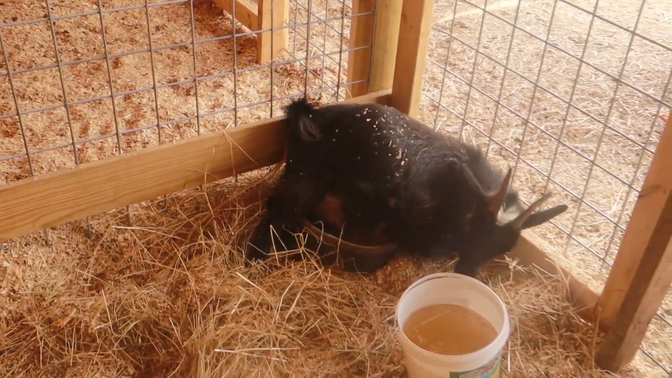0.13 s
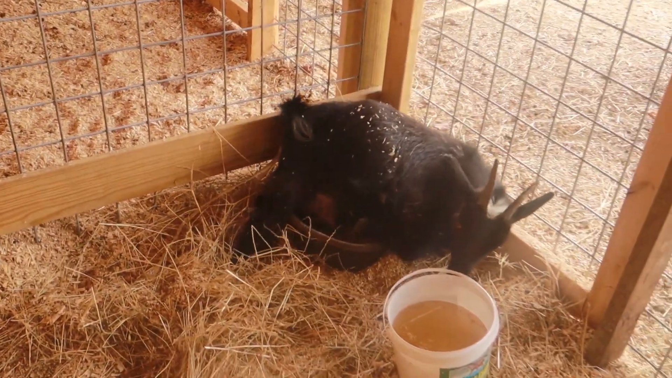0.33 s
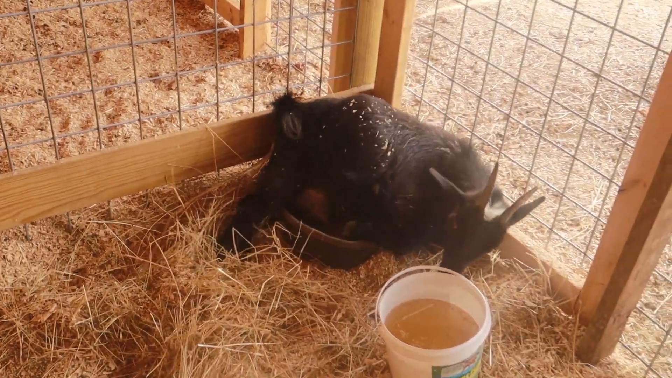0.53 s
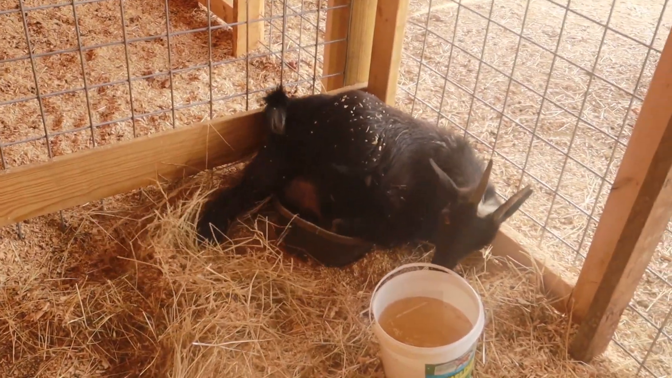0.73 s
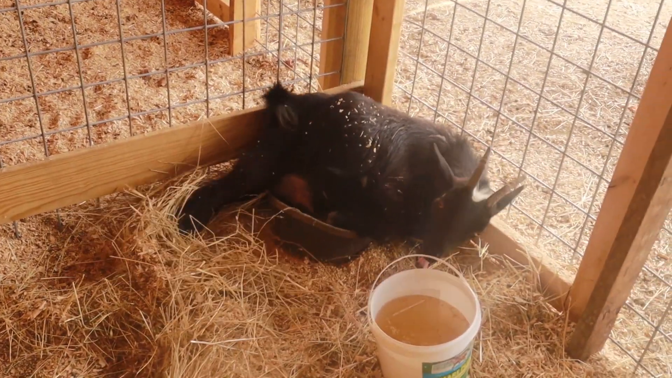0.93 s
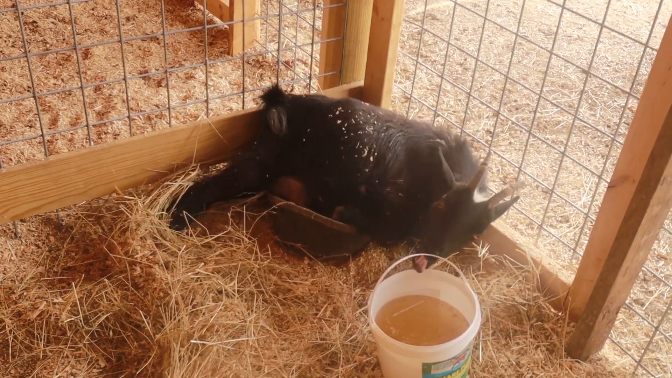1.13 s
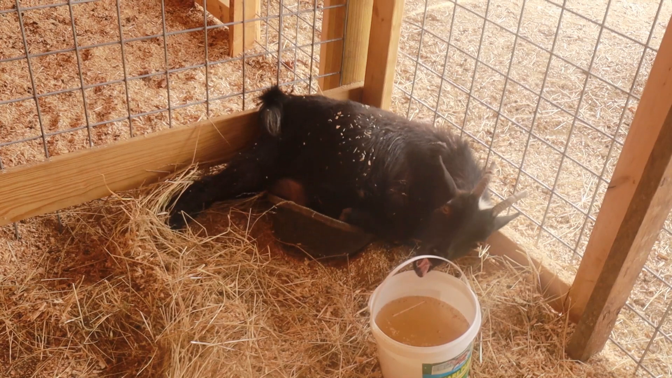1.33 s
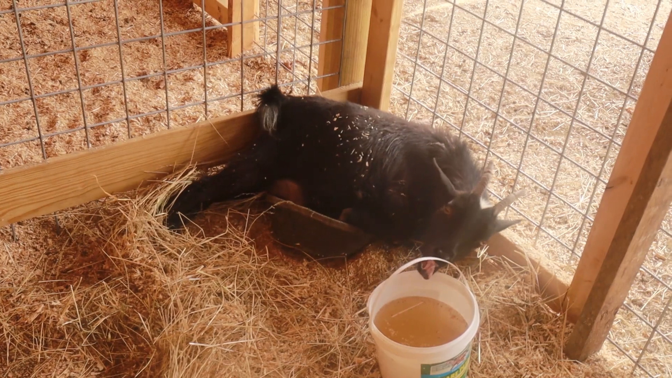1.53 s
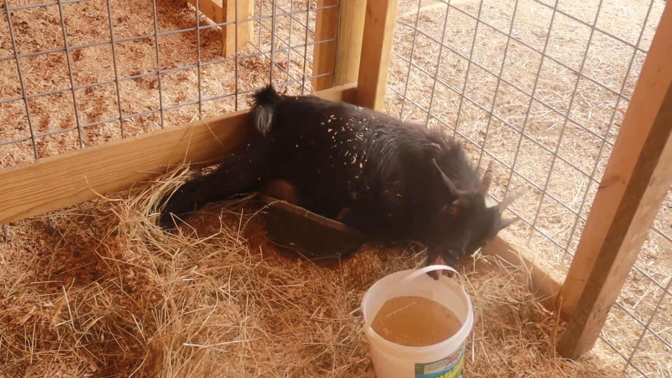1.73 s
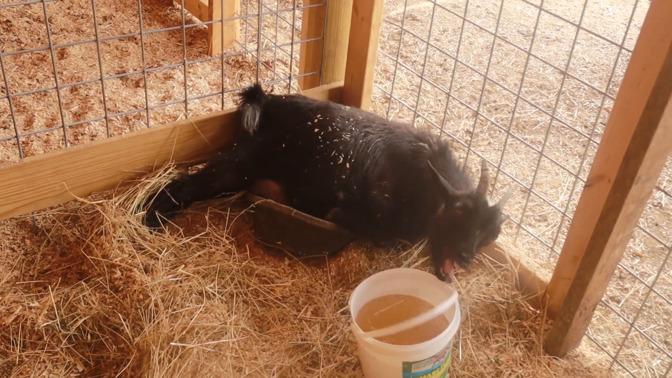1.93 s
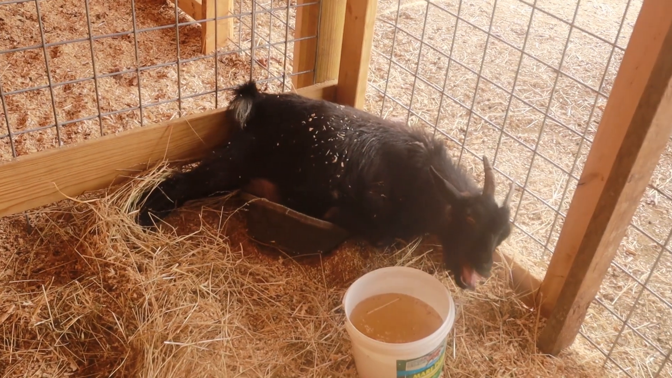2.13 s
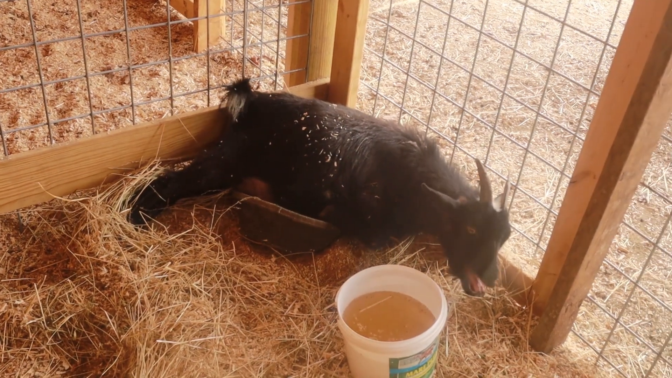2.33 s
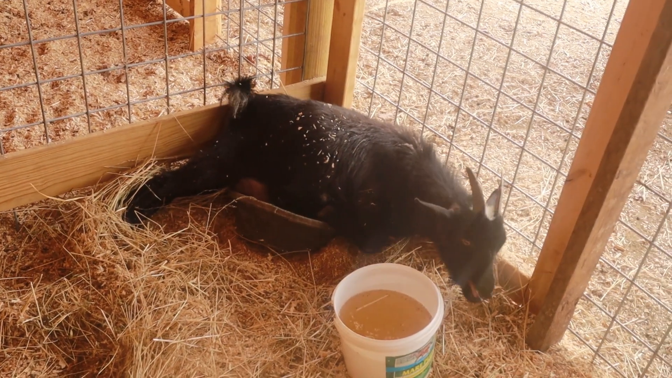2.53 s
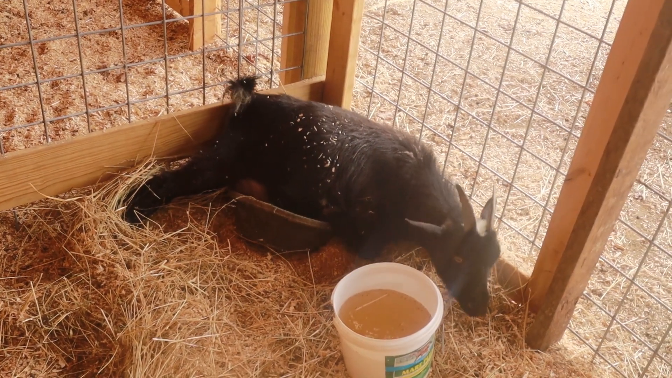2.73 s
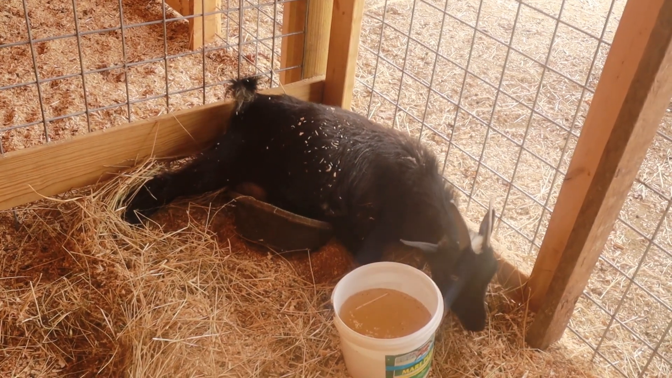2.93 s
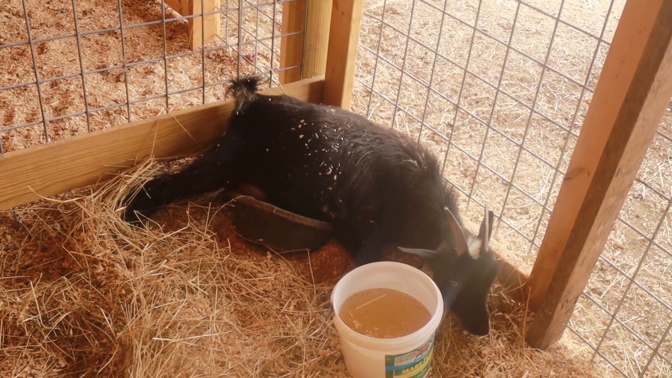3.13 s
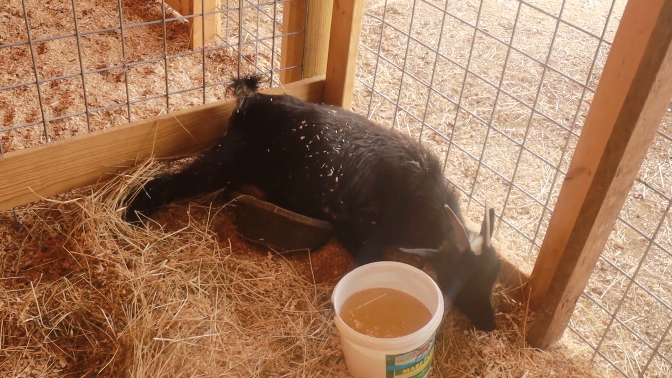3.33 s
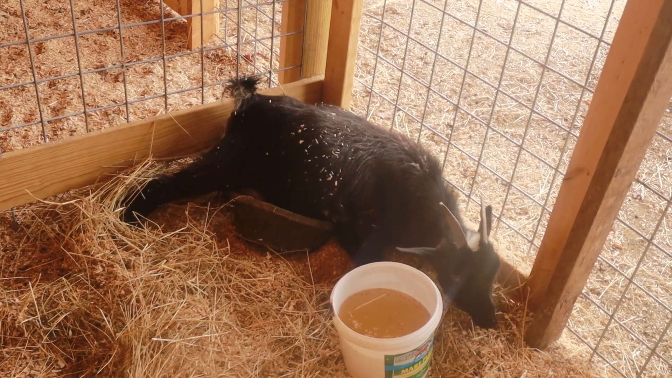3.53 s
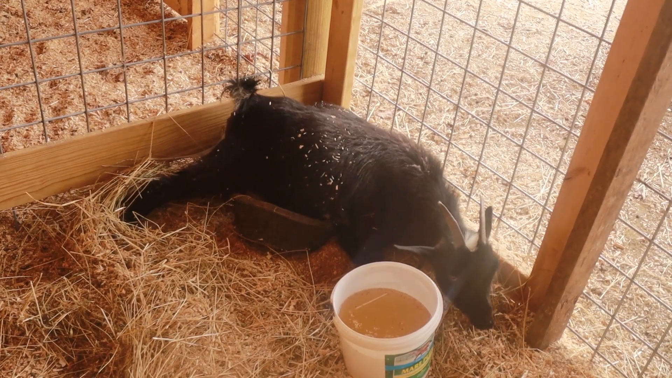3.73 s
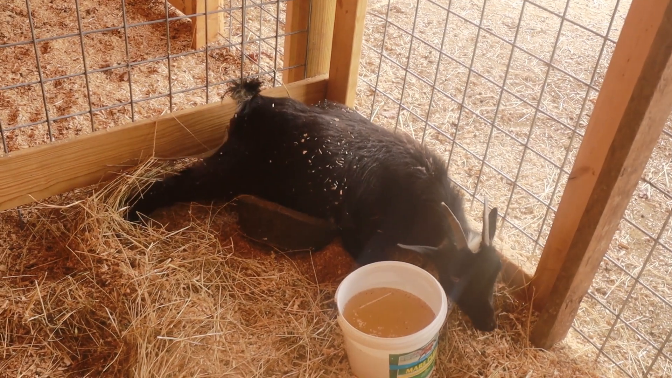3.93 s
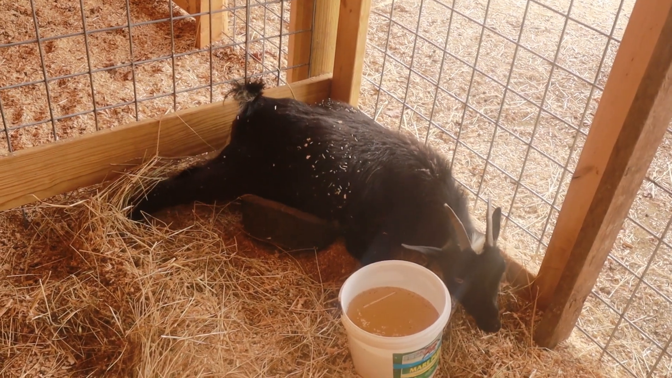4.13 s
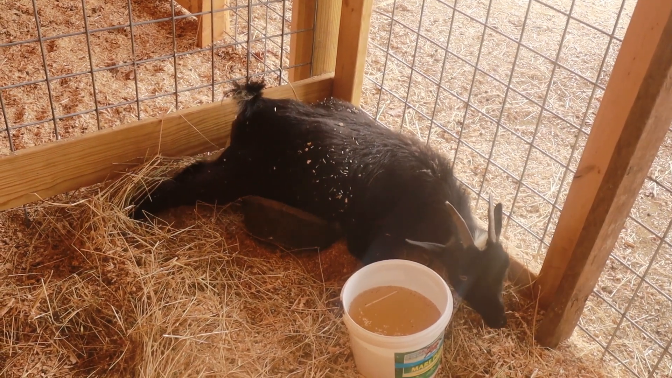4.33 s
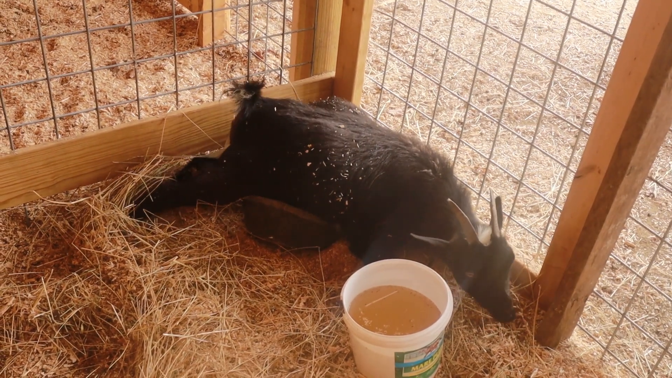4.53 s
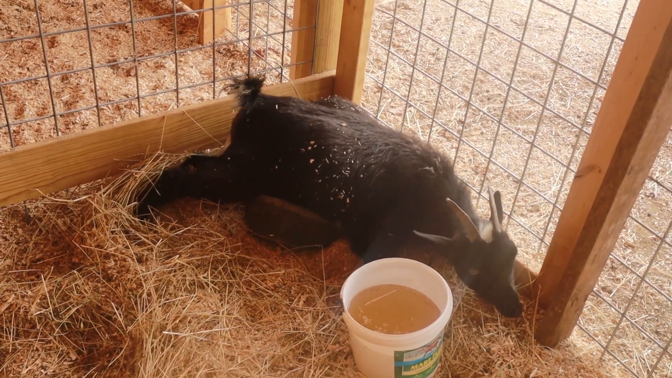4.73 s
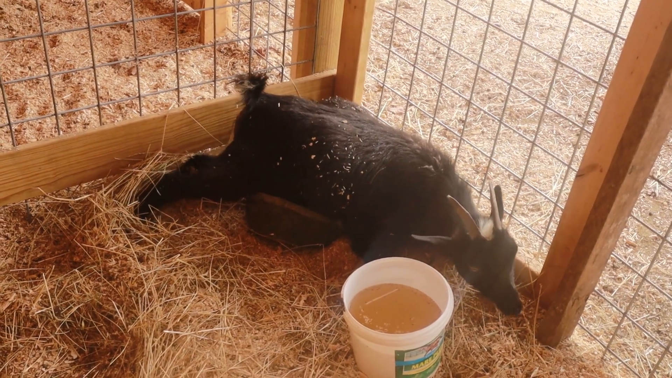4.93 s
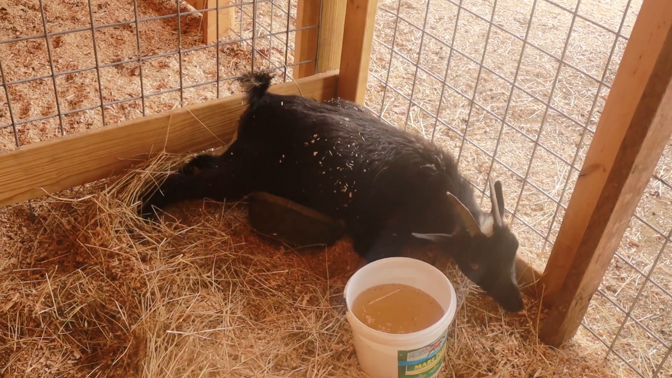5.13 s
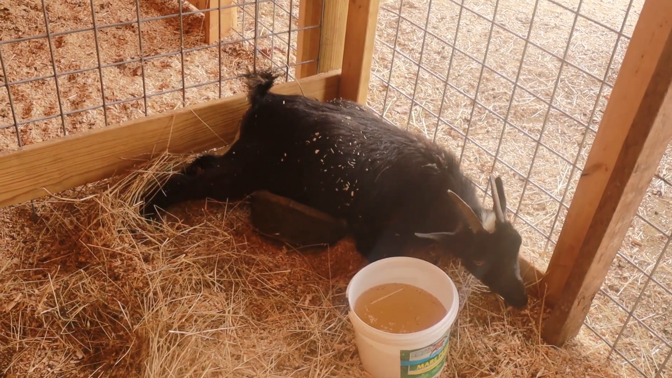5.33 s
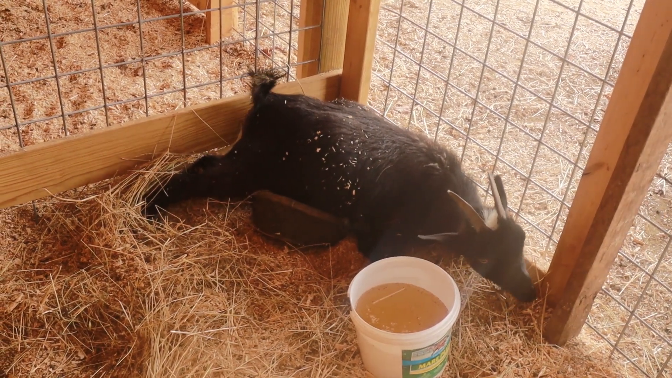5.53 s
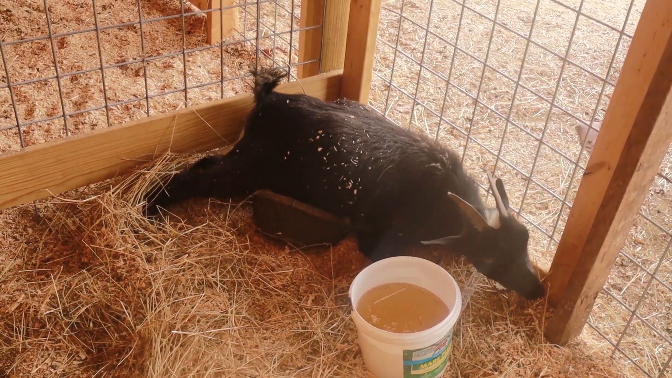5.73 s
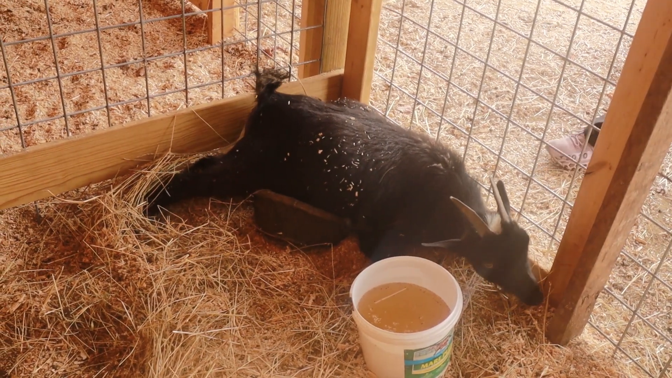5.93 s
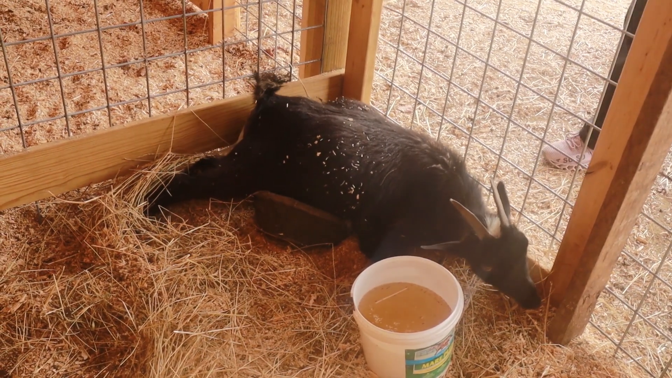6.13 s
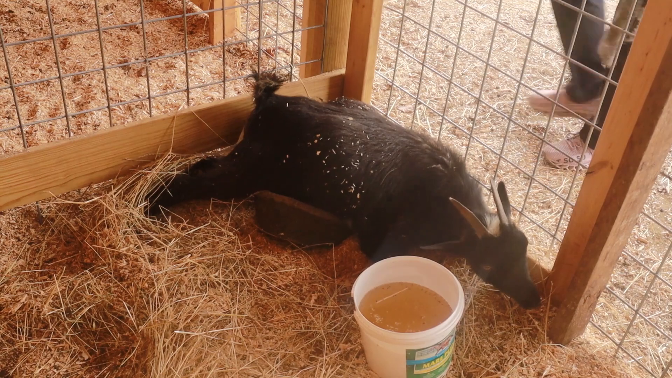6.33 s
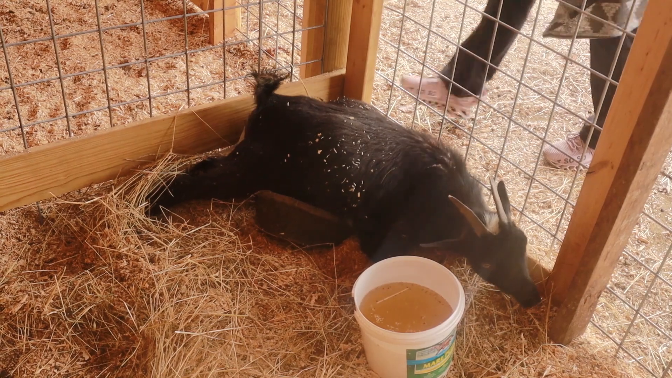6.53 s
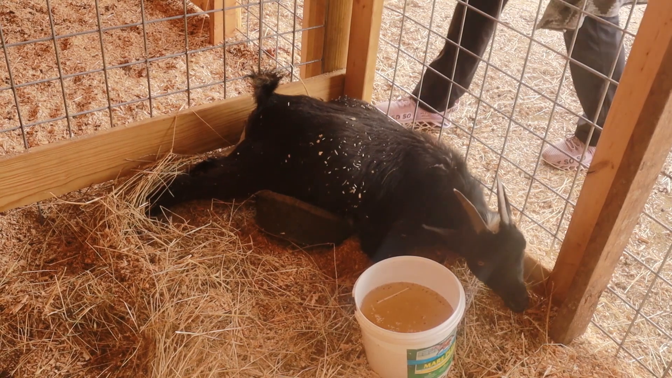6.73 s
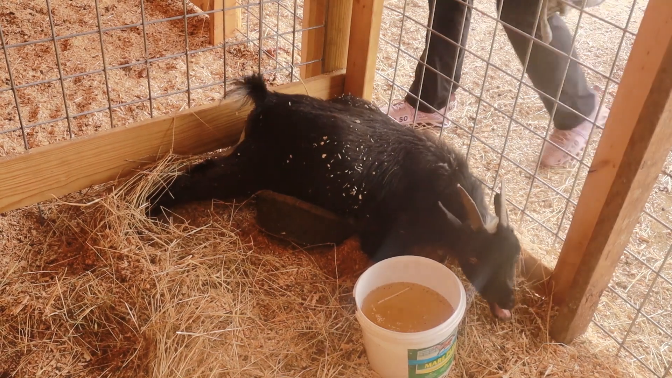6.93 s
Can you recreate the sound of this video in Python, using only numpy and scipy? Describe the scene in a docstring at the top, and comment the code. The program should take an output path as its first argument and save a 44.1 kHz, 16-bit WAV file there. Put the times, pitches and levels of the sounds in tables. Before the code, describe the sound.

A nearby handheld microphone catches a goat's piercing, nearly human-like scream with a short stall echo, first clear and high, later rough and fading. Then comes a lull: faint fan-like drone, gusts rumbling on the microphone, rustling straw, dull knocks, thin bird buzzes and a trembling bleat from a distant young goat. At the end the goat starts a rougher, broken cry that stops abruptly.

```python
"""Throughout: barn murmur, fan-like drone (filtered noise), wind and gusts on the microphone (low noise).
From the start, straw swishes and knocks (noise bursts); at 0.3 s a goat in a straw stall strains out a
long scream (vocal-fold pulses and hoarse noise through a moving mouth, plus echo). The murmur sinks.
From 3.3 s small birds buzz and whistle (pulsed noise, gliding sines); at 3.8 s a far kid bleats (chopped
pulses and noise). At 6.5 s a second, hoarser scream begins and the murmur sinks again."""
import sys
import numpy as np
from scipy import signal
from scipy.fft import rfft, irfft, next_fast_len
from scipy.io import wavfile
from scipy.ndimage import uniform_filter1d, map_coordinates

SR = 44100
rng = np.random.default_rng(int(sys.argv[2]) if len(sys.argv) > 2 else 0)


def wav_out(sig):
    """Save sig, one row per channel (or a flat mono array), as 16-bit PCM at SR to the path in sys.argv[1]."""
    wavfile.write(sys.argv[1], SR, np.round(np.clip(np.atleast_2d(sig).T, -1, 1) * 32767).astype(np.int16))


N = 311787


def amp(db):
    """dB to linear gain."""
    return 10 ** (np.asarray(db) / 20)


def unit(x):
    """x scaled to RMS 1."""
    return x / np.sqrt(np.mean(x ** 2) + 1e-20)


def along(points, hz):
    """(Hz, value) points interpolated on a log-frequency axis."""
    f, v = np.transpose(points)
    return np.interp(np.log(hz + 1), np.log(f + 1), v)


def curves(rows, t):
    """One curve over t for each column after the first."""
    s, *cols = np.transpose(rows)
    return [np.interp(t, s, c) for c in cols]


def wobble(rate_hz, size=N):
    """Smooth random curve of RMS 1, rate_hz knots a second."""
    knots = rng.standard_normal(int(size * rate_hz / SR) + 4)
    return unit(map_coordinates(knots, [np.arange(size) * rate_hz / SR]))


def filtered(x, response):
    """x times a response of frequency, via a padded FFT."""
    m = next_fast_len(len(x) + 8192)
    spectrum = rfft(x, m) * response(np.fft.rfftfreq(m, 1 / SR))
    return irfft(spectrum, m)[:len(x)]


def noise(spectrum, size=N):
    """Noise of RMS 1 shaped by (Hz, dB) points."""
    return unit(filtered(rng.standard_normal(size), lambda hz: amp(along(spectrum, hz))))


def add(out, s, x):
    """Mixes x into out from time s."""
    part = out[round(s * SR):][:len(x)]
    part += x[:len(part)]


def pulses(phase, count):
    """Equal harmonics at scattered phases, RMS 1."""
    turns_rad = rng.uniform(0, 2 * np.pi, count)
    return unit(sum(np.cos((k + 1) * phase + turn) for k, turn in enumerate(turns_rad)))


# barn murmur spectrum: [f/Hz, level/dB per Hz]
BARN_SPECTRUM = [(41, -42), (70, -5.5), (88, -5.5), (135, -1), (161, -7.5), (198, -12), (227, -12.5),
                 (372, -14.5), (701, -22), (1510, -27.5), (1980, -31), (3260, -35), (15500, -45.5)]
# drone bands: [f/Hz, half width/Hz, level/dB re unit murmur]
DRONE_BANDS = [(99, 8, -9), (130.6, 5, -3.5), (195, 12, -11.5)]
# gain of murmur, drone and breeze, sinking under each cry: [t/s, gain/dB]
BARN_GAIN = [(0, -42), (.6, -42.5), (1.1, -50), (2.2, -53.5), (2.9, -52), (3.46, -47), (3.6, -46.5),
             (4.1, -43), (6.4, -43), (6.7, -46.5), (7.07, -49.5)]
# gusts on the microphone: [centre t/s, half width/s, level/dB]
WIND_GUSTS = [(.2, .2, -47), (1.48, .15, -45.5), (3.48, 0.098, -41), (4.3, .25, -51), (4.73, .09, -36.5),
              (5.1, 0.21, -50), (6.72, .12, -44.5)]
BREEZE_DB = -10.5  # re unit murmur


def background():
    """Broadband murmur, drone of narrow noise bands, and low-frequency wind with gusts."""
    t = np.arange(N) / SR
    barn_db, = curves(BARN_GAIN, t)
    barn = amp(-1.5 + 0.44 * wobble(3.6) + 0.92 * wobble(34)) * noise(BARN_SPECTRUM)
    for hz, half_width_hz, db in DRONE_BANDS:
        band = filtered(rng.standard_normal(N), lambda f: 1 / (1 + ((f - hz) / half_width_hz) ** 2))
        barn += amp(db) * unit(band)
    rumble = noise([(10, -14.5), (30, 4.0), (60, -2), (90, -18.5), (200, -57.5)])
    wind = unit(amp(1.1 * wobble(8.8)) * rumble)
    gusts = sum(amp(db) * np.exp(-((t - s) / width) ** 2) for s, width, db in WIND_GUSTS)
    return amp(barn_db) * (barn + amp(BREEZE_DB) * wind) + gusts * wind


# swishes: [t/s, length/s, level/dB before envelope, tilt/dB (doubled at 10 kHz)]
STRAW_SWISHES = [(.0, 0.14, -53, -4), (2.749, 0.078, -59, -2), (3.162, 0.039, -62.5, -9),
                 (3.811, 0.075, -53.5, -0.5), (3.984, 0.064, -44.5, 0.5), (4.138, 0.079, -51.5, 0),
                 (4.256, 0.065, -45.5, -3), (4.358, 0.02, -48, 1), (4.963, 0.048, -55.5, -7),
                 (5.25, 0.067, -54.5, -6), (5.565, 0.024, -54.5, -1), (6.428, 0.085, -41.5, -8.5)]
# knocks and ticks: [t/s, level/dB before envelope, ring f/Hz, t60/s, spectrum at 5 kHz/dB re ring]
STRAW_KNOCKS = [(0.057, -37.5, 1460, 0.087, -36), (0.179, -42.5, 1460, 0.076, -40),
                (3.229, -51.5, 904, 0.086, -35), (3.428, -45, 900, 0.17, -42),
                (4.375, -36, 399.5, 0.24, -23), (5.493, -44, 1506, 0.031, -25),
                (5.662, -43, 1420, 0.13, -46), (6.003, -39.5, 1480, 0.085, -19.5),
                (6.13, -30, 392, 0.15, -41), (6.321, -49, 1530, 0.048, -25), (6.454, -39, 1200, 0.65, -23)]


def straw():
    """Swishes: flickering noise in a Hann window; knocks: decaying noise peaked at the ring frequency."""
    out = np.zeros(N)
    for s, length_s, db, tilt_db in STRAW_SWISHES:
        size = round(length_s * SR)
        colour = [(500, 6), (2500, 9.4), (10000, 2 * tilt_db), (15000, 2 * tilt_db - 30)]
        crackle = noise(colour, size=size)
        add(out, s, amp(db + 2.7 * wobble(454, size=size)) * np.hanning(size) * crackle)
    t = np.arange(SR // 5) / SR
    for s, db, hz, t60_s, crack_db in STRAW_KNOCKS:
        peak = [(hz / 1.8, -12), (hz, 0), (hz * 1.8, -12)]
        ring = noise([(20, -40), *peak, (5000, crack_db), (16000, crack_db - 25)], size=len(t))
        attack = 1 - np.exp(-t / 0.00094)
        add(out, s, amp(db - 60 * t / t60_s) * attack * ring)
    return out


# even folds, gains re clear voice: [hoarse noise/dB, half pitch/dB, quarter pitch/dB]
EVEN_FOLDS_DB = (-31.5, -40.5, -42.5)
# rough spells, added to the even gains:
# [start t/s, end t/s, hoarse noise/dB, half pitch/dB, quarter pitch/dB], re clear voice
ROUGH_SPELLS = [(.28, 0.56, -6, -18, -34), (.715, 0.74, -23.5, -41, -40), (.92, 1.101, -20.5, -38, -39.5),
                (1.05, 1.089, -17.5, -14, -35.5), (1.1, 1.35, -24, -25.5, -39),
                (1.28, 1.315, -17.5, -7.5, -41), (1.36, 1.76, -0.5, -7, -16.5),
                (1.76, 1.909, -5, -4.5, -20.5), (1.919, 2.058, -16, -6, -44.5), (2.135, 2.169, -9, -8, -39),
                (2.135, 2.231, -14, -23, -44), (2.235, 2.34, -21.5, -22, -44),
                (2.34, 2.444, -6.5, -24, -38), (2.44, 2.599, 1, -4, -40), (6.48, 6.809, 7.5, -1, -24),
                (6.81, 6.908, -1.5, -9, -16.5), (6.91, 7.1, 5.5, -2, 3)]
SPELL_EDGE_S = .025


def folds(t):
    """Gains of hoarse noise, half pitch and quarter pitch: an even base plus the rough spells."""
    start, end, *db = np.transpose(ROUGH_SPELLS)[..., None]
    on = np.clip(np.minimum(t - start, end - t) / SPELL_EDGE_S + .5, 0, 1) ** 2
    return amp(EVEN_FOLDS_DB)[:, None] + (amp(db) * on).sum(axis=1)


# first and second cry: [t/s, pitch f/Hz, level/dB]
CRY_1 = [(.3, 321.7, -60.5), (.4, 317.2, -39.5), (.49, 379.8, -32), (.55, 433, -29), (.58, 466, -11.5),
         (.69, 475.4, -11), (.76, 445.2, -12.5), (.89, 435.6, -13), (1.07, 401.7, -12.5),
         (1.2, 409.4, -13.5), (1.45, 403.4, -13), (1.89, 400.3, -15), (2.19, 401, -18), (2.335, 401.2, -21),
         (2.35, 374, -22.5), (2.38, 375.7, -23), (2.42, 349, -27.5), (2.445, 368.2, -27),
         (2.48, 356.6, -41.5), (2.57, 350, -75)]
CRY_2 = [(6.5, 338.2, -47), (6.512, 346.5, -45), (6.53, 350.5, -26), (6.56, 353.2, -26.5),
         (6.61, 350.9, -37), (6.64, 361.3, -29), (6.7, 383.9, -24.5), (6.81, 395, -24.5),
         (6.84, 413.4, -9.5), (6.9, 419.7, -13), (7.0, 429, -12.5), (7.07, 416.4, -13)]
# path through the mouth shapes: [t/s, shape index]
MOUTH_PATH_1 = [(0.419, 0), (.53, .3), (.59, 1), (0.699, 1), (.77, 2), (.9, 2), (1.05, 3), (1.33, 3),
                (1.37, 4), (1.9, 4), (2.08, 5), (2.32, 5), (2.35, 6)]
MOUTH_PATH_2 = [(6.5, 1.5), (6.6, 0), (6.66, 1), (6.81, 2.5), (6.83, 3), (6.9, 3.5), (7.07, 4)]
# mouth responses: [f/Hz, then one level/dB per shape]
MOUTH_SHAPES_1 = [(407, -2.5, -39, -35, -37.5, -24.5, -33, -16), (910, -4, 6.5, 2.5, -8, -15.5, -21, -10),
                  (1050, -15.5, -15, -2, -6.5, -3.5, -8.5, 2.5), (1470, -4, -13, 0, -12.5, -15, -16, -5),
                  (1940, -21.5, -12, -4.5, -3, -1.5, -1.5, -2), (2380, -13, -17, -2, 0.5, -0.5, -1, -4),
                  (3144, -12, -11, -11, -12, -14.5, -11.5, -8.5),
                  (3940, -7, -11.5, 2.5, -5, -9.5, -9.5, -8.5), (4470, -7.5, -6.5, -1, -2, -11, -6, -3),
                  (6440, 0.5, -17, -14, -7, -11.0, -12.5, -7),
                  (7140, -24, -22.5, -10, -18.5, -32.5, -30.5, -29),
                  (8500, -16, -26.5, -16.5, -15.5, -22.5, -21.5, -10),
                  (10900, -28, -51, -33.5, -38, -38.5, -33, -20),
                  (15000, -49, -68.5, -60.5, -53, -53.5, -55.5, -42.5)]
MOUTH_SHAPES_2 = [(204, 4, 0, -10, -10, -38), (410, 6, 4, -17, -16, -23.5), (609, -9, 1, 2.5, -12, -24.5),
                  (900, -15, -18, -28.5, 7, -20), (950, -25, -20, -13, -15, 7),
                  (1137, -12, -13, -11, -19, 0), (1566, -16, -1.5, -9, -17.5, -7.5),
                  (2030, -27, -21, 0, -17, -4.5), (2530, -17, -25, -5.5, -4.5, 5),
                  (2970, -6, -7, -25, -14.5, -6.5), (3733, -23, -9.5, -7.5, -11, -7.5),
                  (4730, -3.5, -16, -15.5, -7, -10.5), (6300, -20, -10.5, -4, -10, -5.5),
                  (7476, -19, -30, -45, -41, -21.5), (8400, -40, -20.5, -15.5, -23, -13.5),
                  (14730, -55, -56.5, -48.5, -58.5, -51)]
# fundamental re the mouth-filtered voice, before its waver: [level/dB per shape]
FUNDAMENTAL_1_DB = [-7, -32.5, -39, -30.5, -29, -32, -32.5]
FUNDAMENTAL_2_DB = [-7, -16, -13, -15.5, -29]
# hoarse noise before the mouth: [f/Hz, level/dB]
HOARSE_SPECTRUM = [(300, -2.5), (600, -8), (1000, 5.5), (2200, -11), (3500, 4.5), (6000, 6.5),
                   (12000, -5.5)]
# trembling held note: [start t/s, end t/s, rate/Hz, pitch share]
HELD_QUAVER = (1.04, 1.36, 12.5, .009)
TREMOR_SHARE = .003  # RMS pitch waver


def cry(rows, path, mouths, fundamental_db, flutter_db, waver_db, jitter_rad, low_hz):
    """Fold pulses, subharmonics and hoarse noise through a moving mouth, plus a wavering fundamental."""
    t = np.arange(rows[0][0] * SR, rows[-1][0] * SR) / SR
    size = len(t)
    hz, level_db = curves(rows, t)
    mouth, = curves(path, t)
    rough, half, quarter = folds(t)

    start, end, rate_hz, depth = HELD_QUAVER
    quaver = -depth * ((t > start) & (t < end)) * np.sin(2 * np.pi * rate_hz * (t - start))
    pitch_hz = hz * (1 + quaver + TREMOR_SHARE * wobble(9, size=size))
    unjittered_phase = 2 * np.pi * np.cumsum(pitch_hz) / SR
    # hoarse folds lose their timing; high overtones blur first
    phase = unjittered_phase + jitter_rad * np.sqrt(rough) * wobble(70, size=size)

    # pattern repeats only every second or fourth pulse
    uneven = half * pulses(phase / 2 + 0.0036 * wobble(25, size=size), count=64)
    uneven += quarter * pulses(phase / 4 + 0.0038 * wobble(25, size=size), count=100)
    # air bursts once a cycle
    hoarse = rough * unit((1 + .5 * np.cos(phase)) * noise(HOARSE_SPECTRUM, size=size))
    sources = [pulses(phase, count=36) + uneven, hoarse]
    f, frames, (voiced, air) = signal.stft(sources, SR, nperseg=512, noverlap=384)

    grid_hz, *columns = np.transpose(mouths)
    place = np.clip(np.interp(frames, t - t[0], mouth), 0, len(columns) - 1)
    shapes = np.array([along(np.transpose([grid_hz, c]), f) for c in columns])
    throat_db = map_coordinates(shapes, np.meshgrid(place, np.arange(len(f))), order=1)

    # each overtone swells and fades on its own
    flutter = uniform_filter1d(rng.standard_normal(air.shape), size=5, axis=0)
    flutter = uniform_filter1d(flutter, size=12, axis=1)
    low_cut = 1 + (low_hz / (f[:, None] + 1)) ** 8
    z = (voiced * amp(flutter_db * unit(flutter)) + air) * amp(throat_db) / low_cut
    voice = signal.istft(z, SR, nperseg=512, noverlap=384)[1][:size]
    voice /= np.sqrt(np.abs(uniform_filter1d(voice ** 2, size=1500)) + 1e-12)  # running RMS to 1

    # fundamental free of the folds' timing jitter; its level wavers when rough
    low_db = np.interp(mouth, np.arange(len(columns)), fundamental_db)
    low_db = low_db + waver_db * np.clip(rough, 0, 1) * wobble(30, size=size)
    fundamental = np.sqrt(2) * amp(low_db) * np.sin(unjittered_phase)
    out = np.zeros(N)
    add(out, t[0], amp(level_db) * (voice + fundamental))
    return out


# stall decay: [f/Hz, t60/s]
STALL_DECAY = [(200, 0.12), (2000, 0.29), (10000, 0.088)]


def stall(x):
    """Echo by convolution with a noise tail, each frequency dying at its own speed."""
    hz, t, z = signal.stft(rng.standard_normal(SR // 2), SR, nperseg=256)
    decay = amp(-60 * t / along(STALL_DECAY, hz)[:, None])
    tail = signal.istft(z * decay, SR, nperseg=256)[1]
    delayed = np.pad(x, (200, 0))  # samples
    return signal.fftconvolve(delayed, tail / np.linalg.norm(tail))[:N]


# buzzes: [t/s, length/s, centre f/Hz, half width/Hz, pulse rate/Hz, level/dB before envelope]
BIRD_BUZZES = [(3.287, 0.13, 5880, 896, 140, -58), (4.131, 0.21, 6270, 940, 130, -48.5),
               (5.05, 0.15, 6560, 1000, 135, -54)]
# whistles, one list each: [t/s, f/Hz, level/dB]
BIRD_WHISTLES = [
    [(5.705, 9100, -76), (5.725, 9074, -56.5), (5.747, 8510, -51), (5.793, 8379, -56), (5.8, 8219, -63)],
    [(6.51, 8900, -65), (6.54, 8200, -57), (6.58, 7850, -54), (6.6, 7900, -53), (6.61, 7900, -62),
     (6.62, 8250, -51), (6.635, 8200, -57)],
    [(3.48, 2860, -71), (3.502, 2941, -57), (3.534, 2945, -75), (3.545, 2925, -69.5)],
    [(4.8, 702, -67), (4.83, 790, -49), (4.854, 750, -64.5), (4.866, 836.6, -56), (4.95, 830, -69)],
]
# trill, one falling note per row: [t/s, level/dB 8 ms in]
BIRD_TRILL = [(5.783, -67), (5.809, -50), (5.842, -49), (5.875, -50), (5.9, -61), (5.92, -64)]


def birds():
    """Buzzes: noise bands whose pulsing fades out; whistles and trill: gliding sines."""
    out = np.zeros(N)
    for s, length_s, hz, half_width_hz, rate_hz, db in BIRD_BUZZES:
        t = np.arange(round(length_s * SR)) / SR
        hiss = rng.standard_normal(len(t))
        band = unit(filtered(hiss, lambda f: np.exp(-((f - hz) / half_width_hz) ** 4)))
        depth = np.clip(1.2 - 2 * t / length_s, 0, 1)  # pulses blur into their echoes
        beat = 1 + depth * np.cos(2 * np.pi * rate_hz * t)
        add(out, s, amp(db) * np.sin(np.pi * (t / length_s) ** 0.74) * beat * band)
    notes = [[(s, 8800, db - 4), (s + .008, 8750, db), (s + .022, 8400, db - 4)] for s, db in BIRD_TRILL]
    for rows in BIRD_WHISTLES + notes:
        t = np.arange(rows[0][0] * SR, rows[-1][0] * SR) / SR
        hz, db = curves(rows, t)
        edge = np.clip(np.minimum(t - t[0], t[-1] - t) / 0.007, 0, 1)
        tone = np.sin(2 * np.pi * np.cumsum(hz) / SR)
        add(out, t[0], np.sqrt(2) * amp(db) * edge * tone)
    return out


# bleat pieces: [t/s (starts 15 ms earlier), level/dB before envelope, initial pitch f/Hz, length/s]
KID_PIECES = [(3.799, -54.5, 705, 0.085), (3.888, -45.5, 712, 0.12), (3.98, -41, 724, 0.11),
              (4.086, -39.5, 727, 0.11), (4.192, -38.5, 716, 0.091), (4.298, -42, 717, 0.088),
              (4.398, -43, 718, 0.091)]
# voiced start of each piece: [f/Hz, gain/dB]
KID_VOICED = [(350, -51), (600, -5), (732, -8), (834, -12), (1400, -6.5), (1850, -20), (2170, -6),
              (2840, 5.5), (3370, -8), (6500, -27), (8450, -65), (14300, -120)]
# raspy end of each piece: [f/Hz, level/dB]
KID_RASPY = [(1180, -41), (2000, -23), (2820, -10), (3540, 10), (4090, 4), (4840, 5.5), (6500, -14),
             (8450, -57), (14300, -120)]


def kid():
    """Far bleat chopped about ten times a second: each piece starts voiced, ends in a brighter rasp."""
    out = np.zeros(N)
    for s, db, hz, length_s in KID_PIECES:
        u = np.arange(round(length_s * SR)) / (length_s * SR)  # 0..1 through the piece
        pitch_hz = hz * (1 + 0.106 * u + 0.0067 * wobble(86, size=len(u)))
        phase = 2 * np.pi * np.cumsum(pitch_hz) / SR
        source = pulses(phase, count=9) + 2.6 * rng.standard_normal(len(u))
        throat = unit(filtered(source, lambda f: amp(along(KID_VOICED, f))))
        voiced = np.sin(np.pi * u ** 0.62) ** 2 * throat
        rasp = amp(-3.0) * np.sin(np.pi * u ** 1.14) ** 2 * noise(KID_RASPY, size=len(u))
        add(out, s - .015, amp(db) * (voiced + rasp))
    return out


def scene():
    """Goat, kid and birds dry and echoed by the stall; straw and background dry."""
    goat = cry(CRY_1, MOUTH_PATH_1, MOUTH_SHAPES_1, FUNDAMENTAL_1_DB,
               flutter_db=3.0, waver_db=1.9, jitter_rad=0.22, low_hz=590)
    goat += cry(CRY_2, MOUTH_PATH_2, MOUTH_SHAPES_2, FUNDAMENTAL_2_DB,
                flutter_db=4, waver_db=5.5, jitter_rad=0.16, low_hz=149.4)
    far = kid() + birds()
    echo = stall(amp(-8) * goat + amp(-4.5) * far)
    return (goat + far + straw() + echo + background())[None]


TOP_HZ = 15640


def record(dry):
    """Rounds off the highest peaks, then removes everything from TOP_HZ up."""
    rounded = dry[0] / (1 + np.abs(dry[0]) ** 8) ** (1 / 8)
    return .96 * filtered(rounded, lambda hz: hz < TOP_HZ)[None]


dry = scene()
out = record(dry)
wav_out(out)
```